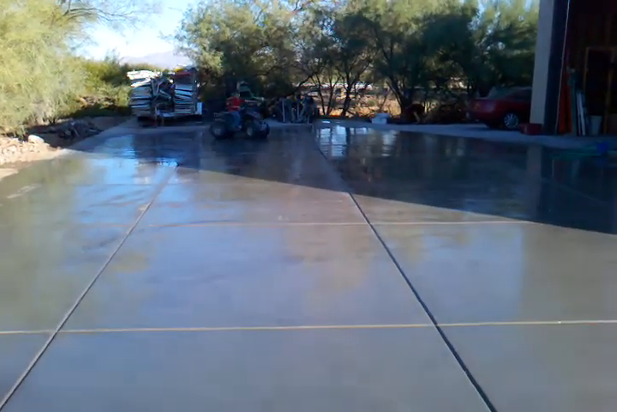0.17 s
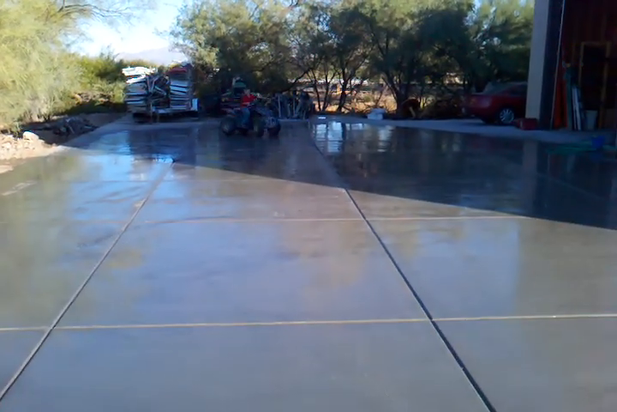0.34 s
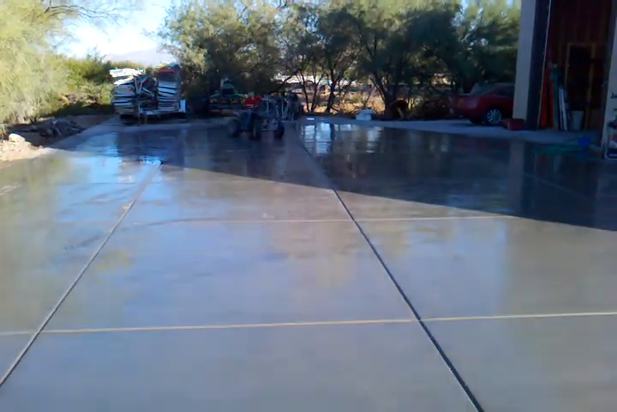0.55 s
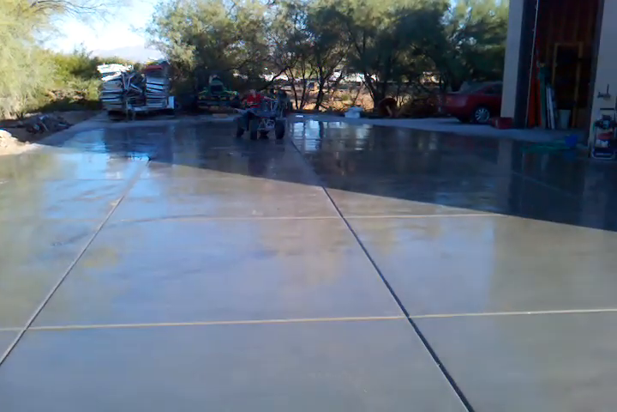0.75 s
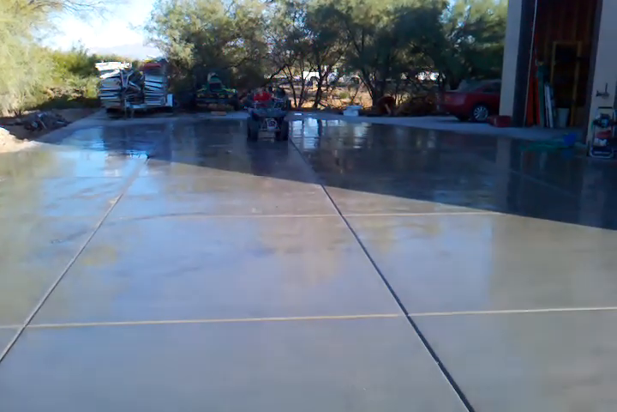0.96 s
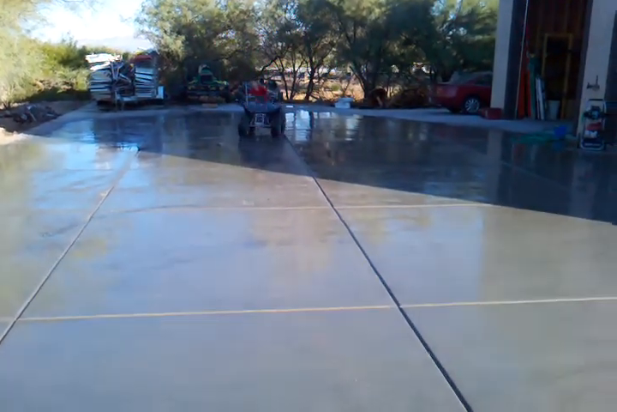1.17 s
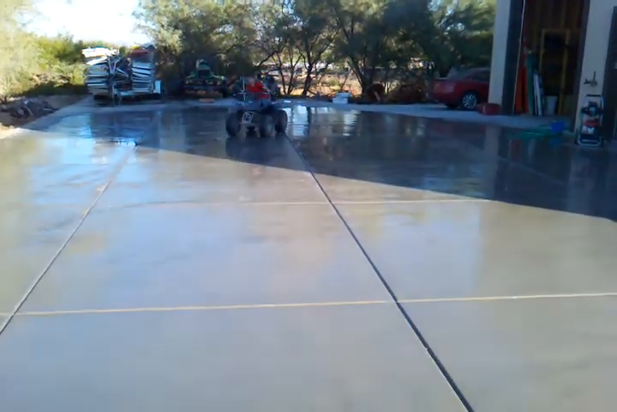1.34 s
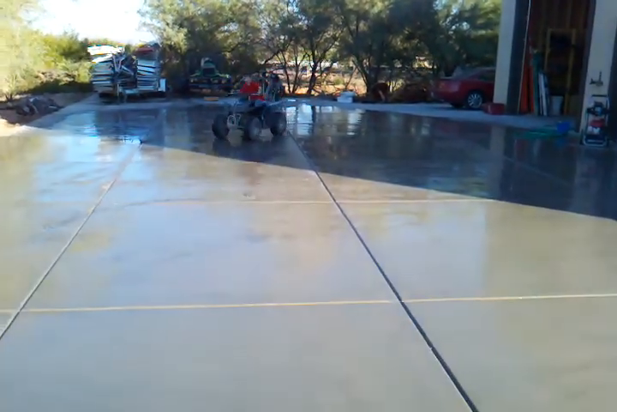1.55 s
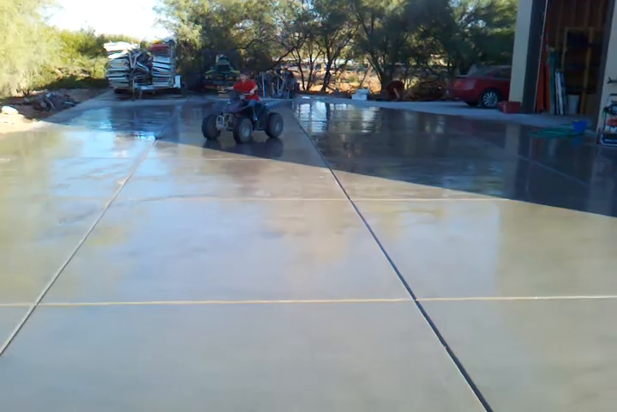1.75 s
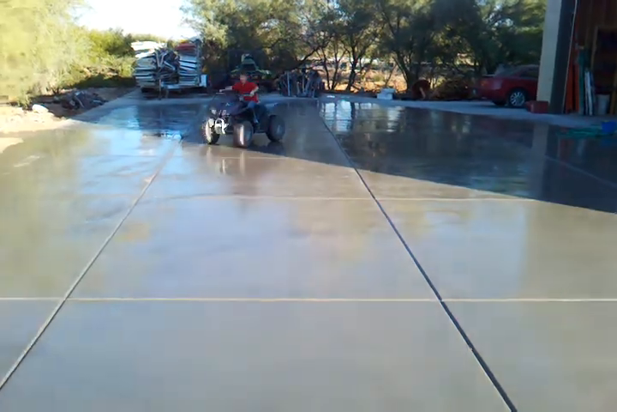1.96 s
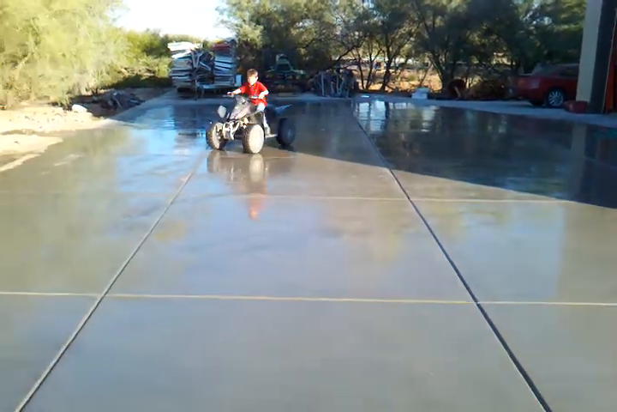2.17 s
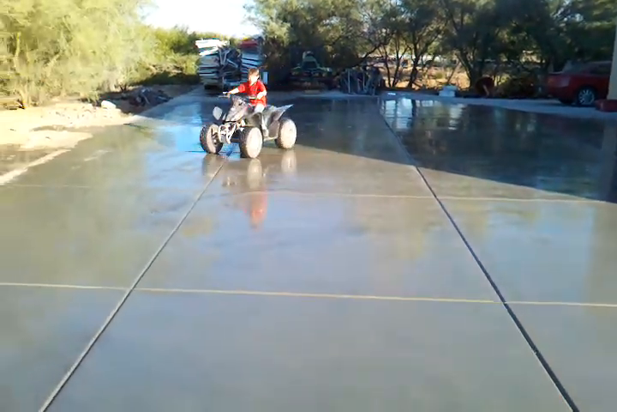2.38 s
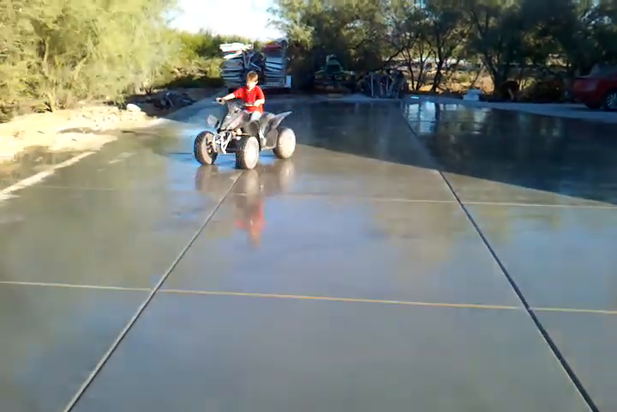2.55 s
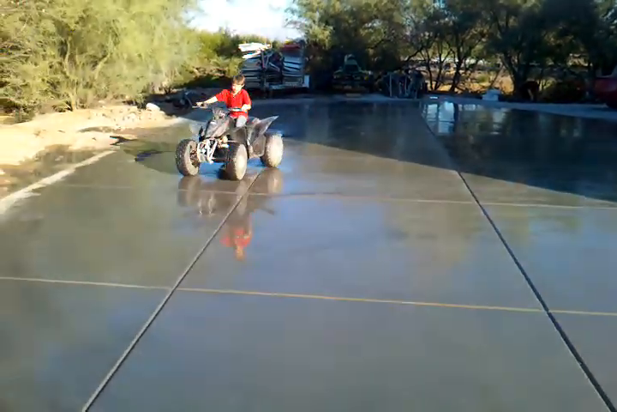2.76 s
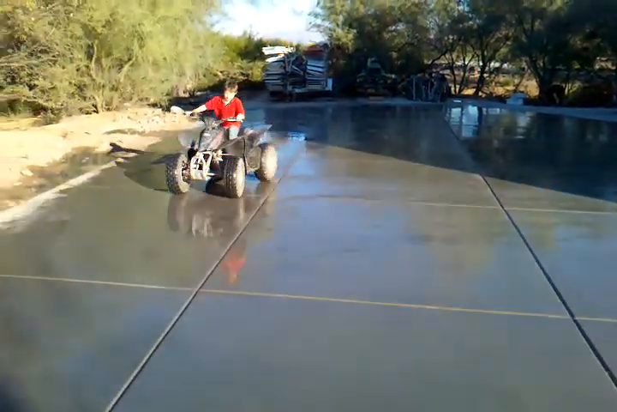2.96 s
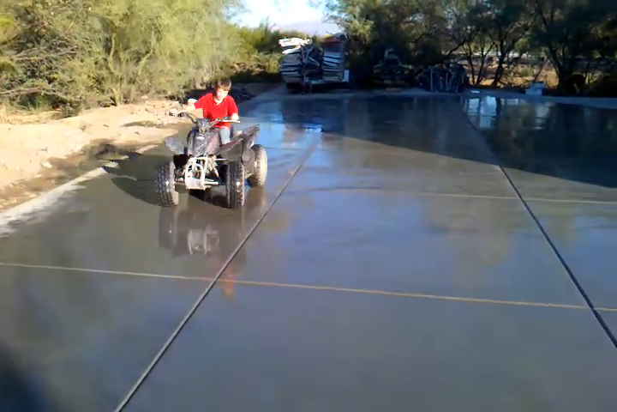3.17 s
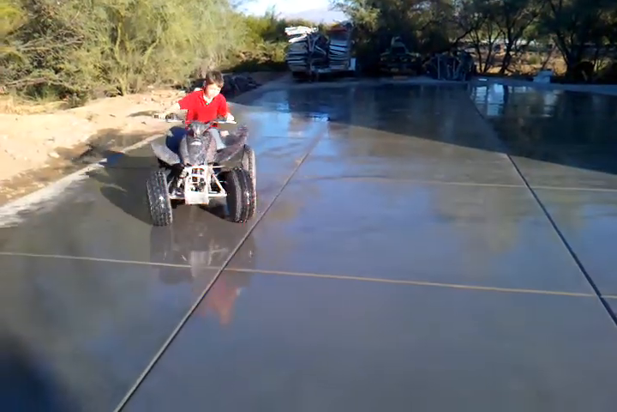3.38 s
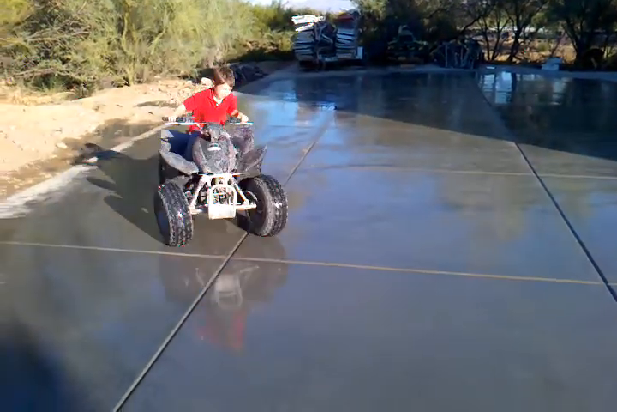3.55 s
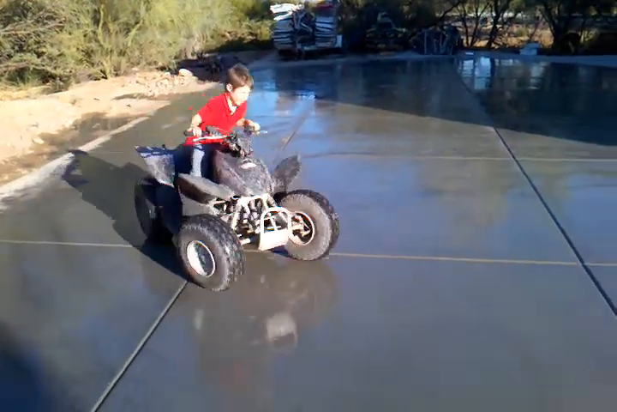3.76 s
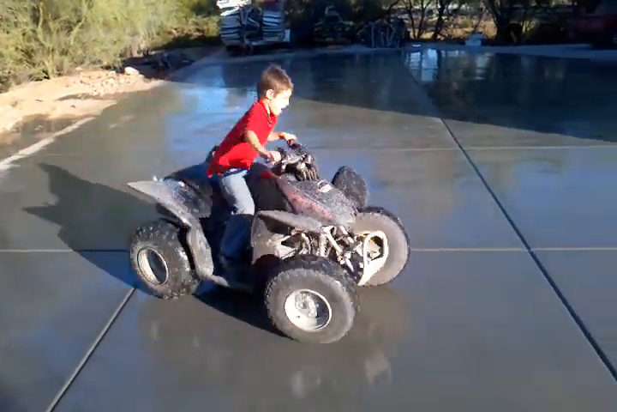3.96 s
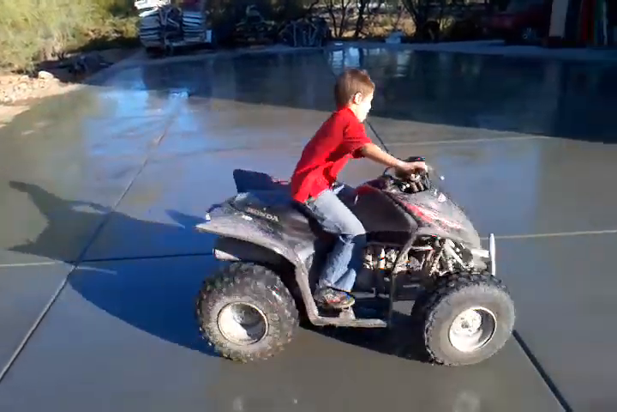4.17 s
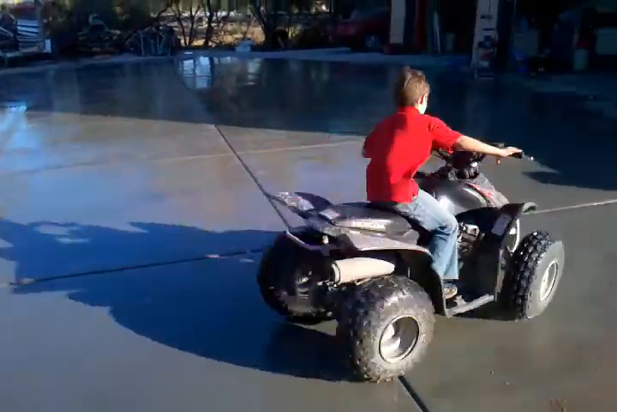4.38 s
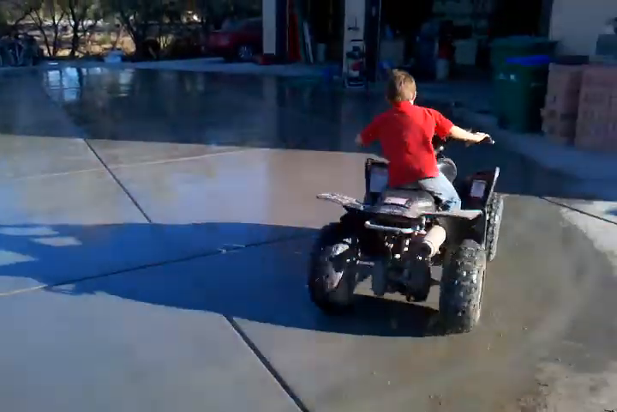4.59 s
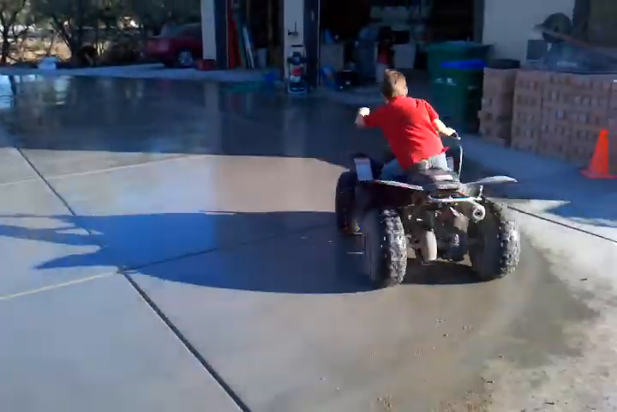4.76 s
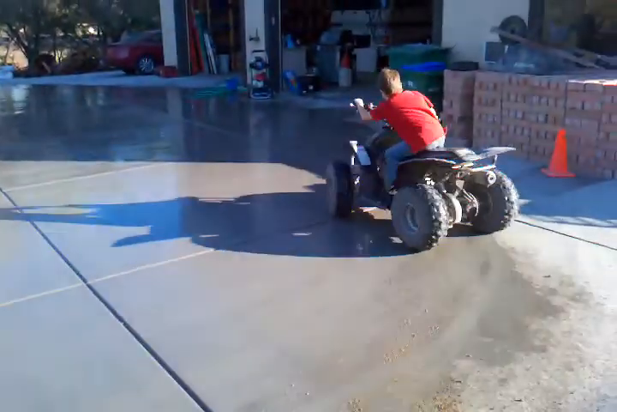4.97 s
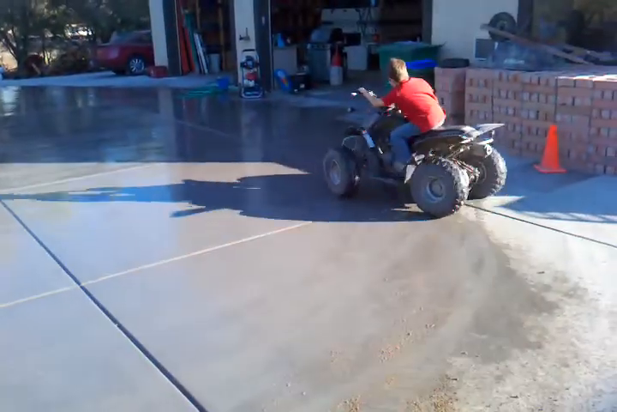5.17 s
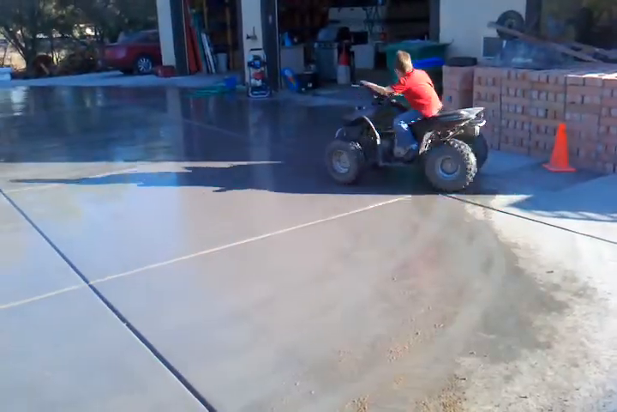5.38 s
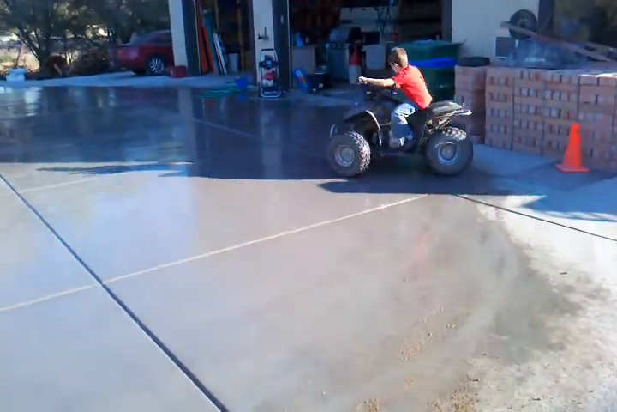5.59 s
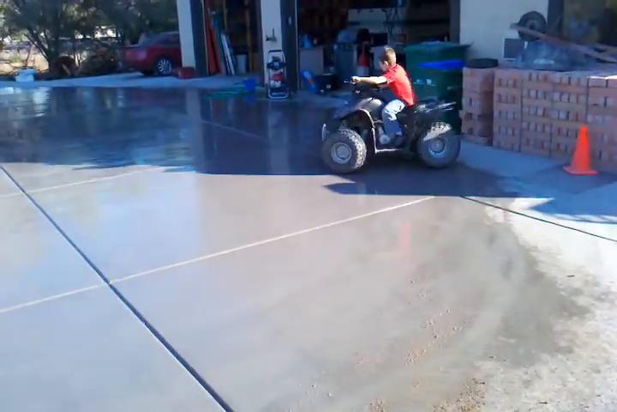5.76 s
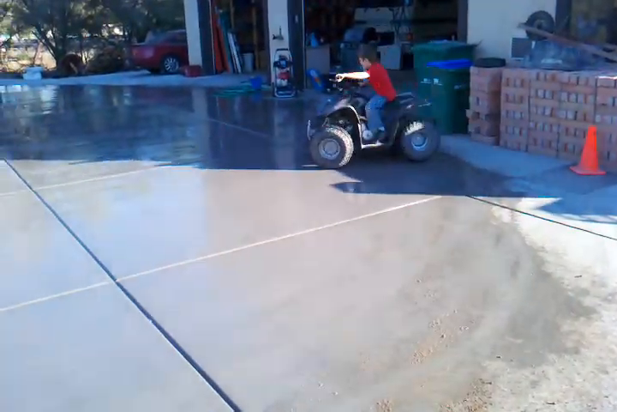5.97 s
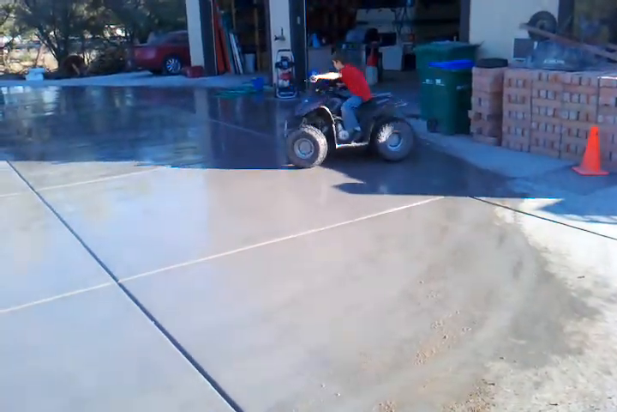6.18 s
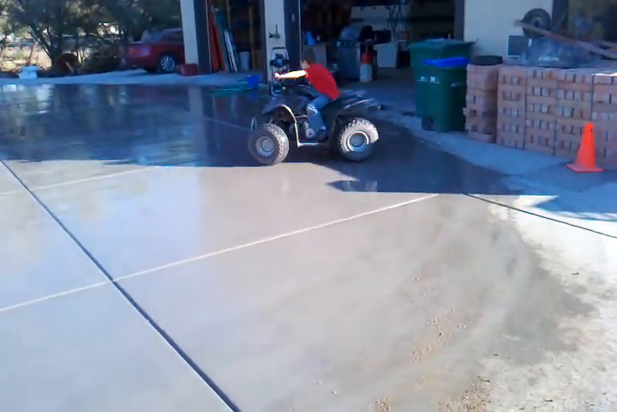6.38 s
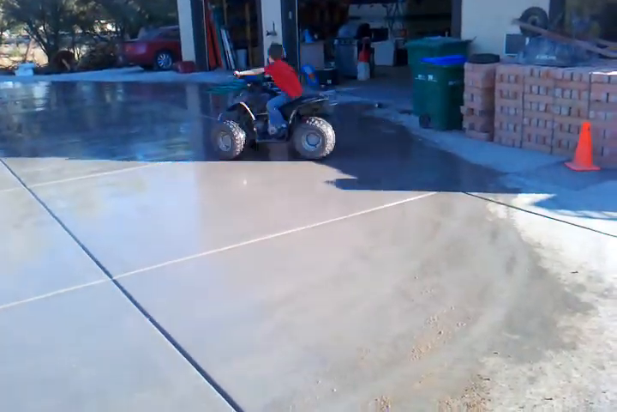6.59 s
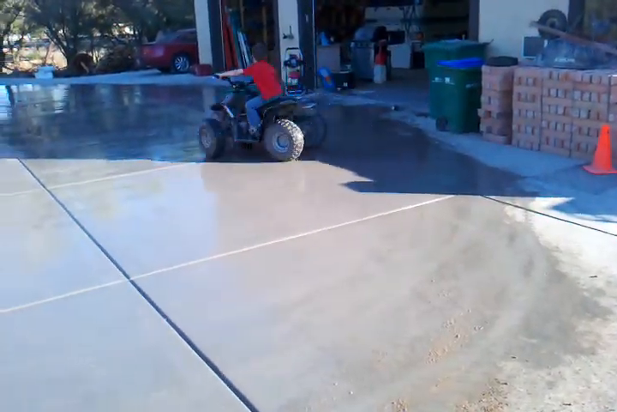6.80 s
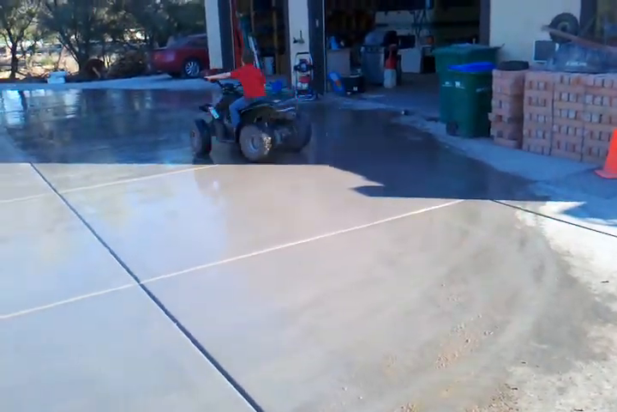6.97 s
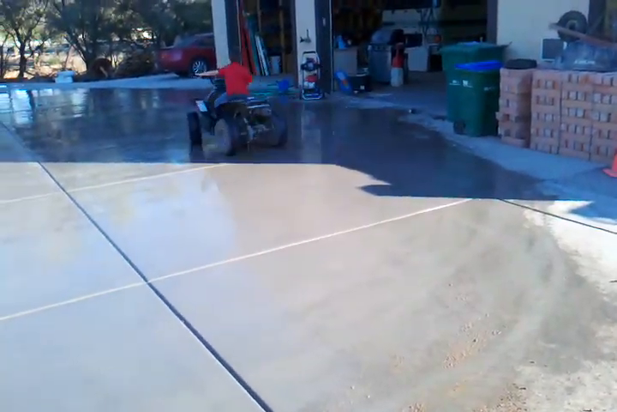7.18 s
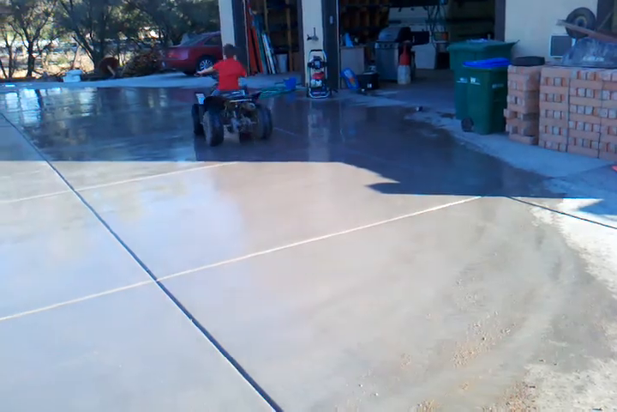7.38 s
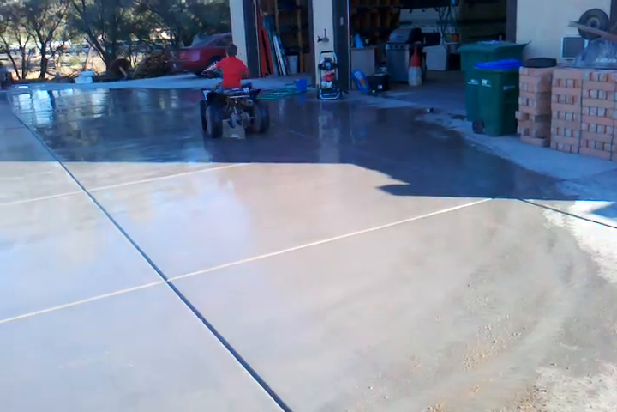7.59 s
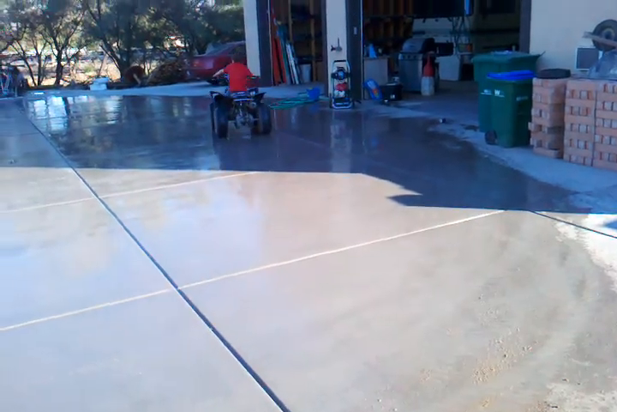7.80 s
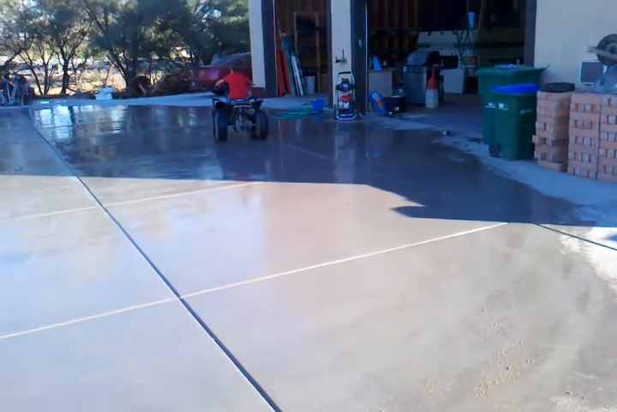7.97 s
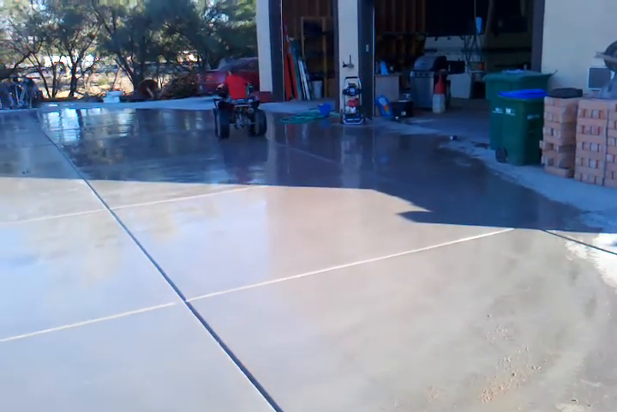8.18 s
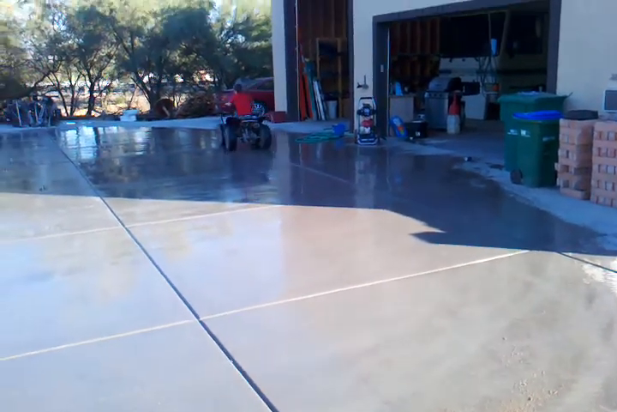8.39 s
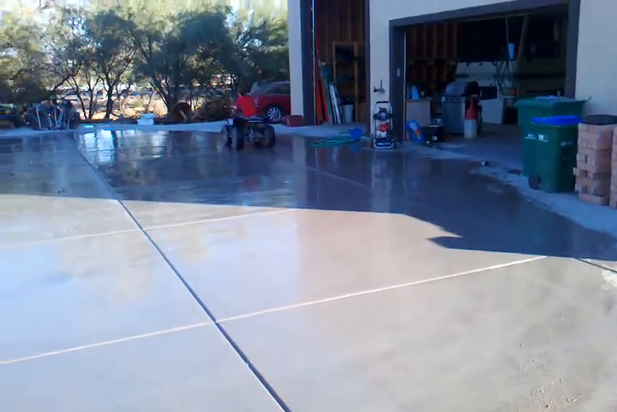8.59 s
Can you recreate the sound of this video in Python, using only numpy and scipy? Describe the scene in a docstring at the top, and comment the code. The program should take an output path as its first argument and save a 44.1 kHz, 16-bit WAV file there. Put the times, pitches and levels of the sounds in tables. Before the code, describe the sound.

Outdoors in an open wet concrete yard, a small single-cylinder quad engine putters at a distance while wind thumps the microphone. It revs in short squeezes, approaches and passes very close around four seconds with loud clatter, gear whine and wet tyre hiss. Loose metal ticks as it turns; the engine slows to an uneven chug, then barks and climbs in pitch, moving away.

```python
"""A wet concrete yard: a small single-cylinder quad bike circles, passes close, runs slow and pulls away.
Each firing thumps through the silencer, cracks out of the tailpipe and rattles the engine.
Filtered noise makes the tyres' hiss and tread roar; sines in step with the engine make the gear whine.
Wind, as lumpy low noise and single eddies, buffets a microphone with two closely spaced ports."""
import sys
import numpy as np
from scipy import signal
from scipy.fft import rfft, irfft, next_fast_len
from scipy.io import wavfile
from scipy.ndimage import uniform_filter1d

SR = 44100
rng = np.random.default_rng(int(sys.argv[2]) if len(sys.argv) > 2 else 0)


def inscribe(sig):
    """Save sig as 16-bit PCM at rate SR to the path in sys.argv[1].

    A 1-D sig is mono; a 2-D sig holds one channel per row.
    Samples are clipped to [-1, 1] before scaling.
    """
    pcm = np.round(np.clip(np.atleast_2d(sig).T, -1, 1) * 32767)
    wavfile.write(sys.argv[1], SR, pcm.astype(np.int16))


N = 381024
TIME = np.arange(N) / SR

# spectrum of the valve rattle and loose parts: frequency_hz, relative_db
RATTLE_SPECTRUM = [(100, -58), (700, -11.5), (1100, 4.5), (1400, 0.5), (1650, 3.5), (1950, 1), (2300, -4),
                   (2800, -4.5), (3600, -12.5), (6000, -15.5)]
# spectrum of the tyre hiss and of the ticks' fine edge: frequency_hz, relative_db
HISS_SPECTRUM = [(1500, 3), (2800, -18.5), (3900, 3), (4600, 2.5), (5500, -3), (7300, -4), (8600, -2.5),
                 (10500, 1), (14000, 7)]
# the level laws below hold at this distance (m) and speed (firings per s)
REFERENCE_M, REFERENCE_RATE = 5, 40
# boom effort on a shut throttle, and bark effort too (dB)
COAST_EFFORT_DB = -8


def from_db(db):
    """Decibels to gain."""
    return np.exp(np.asarray(db) * (np.log(10) / 20))


def rms_one(x):
    """Scale to an rms of 1."""
    return x / np.sqrt(np.mean(x ** 2) + 1e-20)


def in_time(rows):
    """Each column of a curve, drawn straight between its times, at every sample."""
    s, *columns = np.transpose(rows)
    return [np.interp(TIME, s, c) for c in columns]


def swells(rows):
    """Summed gain of bell-shaped swells: centre_s, half_length_s, peak_db."""
    return sum(from_db(db) * np.exp(-((TIME - s) / length) ** 2) for s, length, db in rows)


def drift(rate):
    """Smooth chance with about `rate` turns a second and a spread of 1."""
    step = 40   # worked out at every 40th sample
    r = np.exp(-2 * step * np.pi * rate / SR)
    chance = rng.standard_normal(N // step + 2002)
    slow = signal.lfilter([1], [1, -2 * r, r * r], chance)[2000:]
    return np.interp(np.arange(N) / step, np.arange(len(slow)), rms_one(slow))


def coloured(x, spectrum=((1, 0),), dips=()):
    """Filter by a spectrum and by bell-shaped dips."""
    size = next_fast_len(x.shape[-1] + 2048)
    hz = np.maximum(np.fft.rfftfreq(size, 1 / SR), 1)
    points = np.array(spectrum)
    db = np.interp(np.log(hz), np.log(points[:, 0]), points[:, 1])
    for centre, width, depth in dips:
        db = db + depth * np.exp(-((hz - centre) / width) ** 2)
    return irfft(rfft(x, size) * from_db(db), size)[..., :x.shape[-1]]


def resonate(x, modes):
    """Parallel resonances with alternating signs."""
    out = 0
    for k, (hz, width, db) in enumerate(modes):
        r = np.exp(-np.pi * width / SR)
        poles = [1, -2 * r * np.cos(2 * np.pi * hz / SR), r * r]
        ring = (1 - r * r) / 2 * signal.lfilter([1, 0, -1], poles, x)
        out = out + (-1) ** k * from_db(db) * ring
    return out


def band(x, low_hz, high_hz):
    """Keep one range of frequencies."""
    return signal.sosfilt(signal.butter(2, [low_hz, high_hz], "band", fs=SR, output="sos"), x)


def dense_ring(t60):
    """Middle and side response of countless modes or echoes dying together; mean energy 1."""
    t = TIME[:SR // 4]
    ring = rng.standard_normal((2, len(t))) * from_db(-60 * t / t60)
    ring = ring[:, t < t60 / 2]
    return ring / np.sqrt(np.sum(ring ** 2) / 2)


def convolve(x, response):
    """Play one signal through a middle and a side response."""
    return signal.oaconvolve(np.float32(x)[None], np.float32(response), axes=-1)[:, :N]


def evened(pair):
    """Hold the middle channel near rms 1 over a few engine cycles; the side follows its gain."""
    size = SR // 10
    power = uniform_filter1d(uniform_filter1d(pair[0] ** 2, size), size)
    return pair / np.sqrt(np.abs(power) + 1e-4 * power.mean())


def strokes(cycle, angle, uneven_db, jitter_s):
    """One click per engine cycle at a given share of it, each a little different."""
    at = np.flatnonzero(np.diff(np.floor(cycle - angle)) > 0)
    chance = rng.standard_normal((len(at), 2))
    late_s = chance[:, 0] * np.broadcast_to(jitter_s, N)[at]
    db = chance[:, 1] * np.broadcast_to(uneven_db, N)[at]
    clicks = np.zeros(N)
    clicks[np.clip(at + (late_s * SR).astype(int), 0, N - 1)] = from_db(db)
    return clicks


def yard(x, echo_db, t60, side_share):
    """Direct sound plus scatter from walls and trees, whose pattern shifts steadily."""
    shift = 2 * np.pi * 0.458 * TIME
    echoes = sum(np.cos(shift + k * np.pi / 4) * convolve(x, dense_ring(t60)) for k in range(4))
    echoes = from_db(echo_db) * echoes / np.sqrt(2)
    return evened(np.array([x + echoes[0], side_share * x + echoes[1]]))


def level_db(law, rate, distance, heading):
    """A part is louder or softer with distance, engine speed and the end of the quad that faces us."""
    db, distance_db, speed_db, nose_db, tail_db = law
    facing = np.cos(np.radians(heading))
    near_and_fast = -distance_db * np.log2(distance / REFERENCE_M) + speed_db * np.log2(rate / REFERENCE_RATE)
    return db + near_and_fast - nose_db * np.maximum(facing, 0) + tail_db * np.maximum(-facing, 0)


def still_air():
    """The faint bed of the yard: steady noise with a falling treble."""
    # frequency_hz, relative_db
    air_spectrum = [(30, -5), (150, 14.5), (800, 6), (2000, 7), (5000, -29), (14000, -61)]
    return from_db(-51.5) * rms_one(coloured(rng.standard_normal((2, N)), air_spectrum))


def wind(lumpy_db, buffet_s, top):
    """Lumpy low turbulence, and eddies that each push and pull the ports; the strongest saturate."""
    # spectrum of the turbulence: frequency_hz, relative_db
    wind_spectrum = [(20, -36), (50, -24), (100, 4.5), (190, 0.5), (300, -12), (450, -13), (700, -25),
                     (1200, -37), (4000, -86)]
    # gusts on top of the breeze: centre_s, half_length_s, peak_db
    gust_swells = [(.3, 0.07, -22.5), (.45, 0.029, -19), (.863, 0.016, -18.5), (1.0, 0.074, -14),
                   (1.13, 0.045, -32), (3.35, .09, -36), (5.24, 0.054, -37), (8.5, 0.097, -32)]
    # strong eddies hitting the ports: centre_s, level_db (before saturation)
    buffets = [(.277, -10), (.449, -6.5), (.855, -7.5), (.939, -13), (.995, -4), (1.024, -6), (1.044, -3.5),
               (1.058, -7), (1.12, -9), (1.179, -7.5), (1.229, -15), (1.32, -16.5), (1.414, -13.5),
               (1.703, -37), (2.423, -16.5), (3.327, -7.5), (4.408, -15), (5.91, -22), (6.459, -24),
               (7.663, -11), (8.221, -12.5)]
    # the ports soften the wind's deepest push slightly: frequency_hz, gain_db
    port_low_cut = [(25, -2), (55, 0), (100, 1.5)]
    breeze_db, breeze_waver_db = -37, 1.5
    strength = from_db(breeze_db + breeze_waver_db * drift(2.5)) + swells(gust_swells)
    lumps = rng.standard_normal((1, N)) * from_db(lumpy_db * drift(15))
    out = strength * evened(coloured(lumps, wind_spectrum))[0]

    # weak eddies come at random, about 1.6 a second in the breeze and more often in a gust
    born = TIME[rng.random(N) < 1.6 * strength / from_db(breeze_db) / SR]
    eddies = buffets + [(s, -23 + 3 * rng.standard_normal()) for s in born]
    for (s, db), (size, turn) in zip(eddies, rng.random((len(eddies), 2))):
        near = slice(max(int((s - .02) * SR), 0), int((s + .02) * SR))
        age = (TIME[near] - s) / (buffet_s * (0.9 + 0.49 * size))
        push = np.cos(4.95 * age + 2 * np.pi * turn) / (1 + 1.8 * age ** 2) ** 2
        out[near] += from_db(db) * push
    return coloured(top * np.tanh(out / top), port_low_cut)


def tread(cycle, low_hz, high_hz, throb_db):
    """A hollow roar of band-limited noise, throbbing once per firing."""
    roar = band(band(rng.standard_normal((2, N)), low_hz, high_hz), low_hz, high_hz)
    return rms_one(roar * from_db(throb_db * np.cos(2 * np.pi * cycle)))


def tyres(cycle, distance, flutter_db, throb_db):
    """Wet tread sprays fine droplets; each range flutters by itself and distance shifts their balance."""
    # the spray in three ranges: low_hz, high_hz, loss_db_per_m, tight_turn_change_db
    spray_bands = [(1480, 4820, 1, 2), (5720, 8340, 0.6, 9), (10400, 12020, 0.88, 3)]
    # the tyres scrub in the tight turn, centred at 5.75 s with a half length of 1 s
    turn = np.exp(-((TIME - 5.75) / 1) ** 2)
    # a change at each firing that fades with a time constant of 0.3 cycle
    throb = throb_db * np.exp(-(cycle % 1) / .3)
    out = 0
    for low_hz, high_hz, loss_db, turn_db in spray_bands:
        droplets_db = 2.7 * np.minimum(rng.exponential(1, N), 5)
        spray = rng.standard_normal((2, N)) * from_db(droplets_db)
        swell_db = flutter_db * drift(12.8) + throb - loss_db * distance + turn_db * turn
        out = out + band(spray, low_hz, high_hz) * from_db(swell_db)
    return evened(coloured(out, HISS_SPECTRUM))


def jolts():
    """Loose parts chatter as the quad jolts: short flurries of metallic ticks."""
    # centre_s, half_length_s, peak_db
    jolt_swells = [(4.61, 0.022, -25.5), (4.72, 0.065, -25), (4.832, 0.021, -24.5), (4.99, 0.051, -27.5),
                   (5.06, 0.0098, -27), (5.12, 0.088, -29), (5.352, 0.028, -25), (5.4, 0.013, -40),
                   (5.86, 0.25, -34.5), (7.381, 0.0087, -40)]
    ticks = rng.standard_normal((2, N)) * (rng.random(N) < 2500 / SR)
    metal = coloured(ticks, RATTLE_SPECTRUM) + 0.051 * coloured(ticks, HISS_SPECTRUM)
    return swells(jolt_swells) * rms_one(metal)


def gears(cycle, distance, waver_db):
    """Meshing teeth whine in step with the engine, at full strength only within 3 m."""
    # multiple_of_firing_rate, level_db (against the valve rattle)
    gear_orders = [(18, -15), (24.5, -15), (26, -15), (27.5, -14)]
    tones = 0
    for order, db in gear_orders:
        phase = 2 * np.pi * order * cycle + 0.37 * drift(36)
        tones = tones + from_db(db + waver_db * drift(21.0)) * np.sin(phase)
    return tones * np.minimum(3 / distance, 1) ** 2 * np.array([[1], [.7]])


def clatter(cycle, spectrum, slop_s, ring_t60, rough, burst_share):
    """Contacts ring the engine on every cycle; a burst of gas noise follows each firing."""
    # metal contacts within one engine cycle: share_of_cycle, level_db
    contacts = [(.01, -8), (.27, -11.5), (.48, -9), (.8, -11.5)]
    knocks = 0
    for angle, db in contacts:
        hits = strokes(cycle, angle, uneven_db=2.5, jitter_s=slop_s) * from_db(db + 2 * drift(1.2))
        # other faces of the engine turn to the ports, steadily, as the quad circles
        facing = 2 * np.pi * (0.2948 * TIME + rng.random())
        for share in (np.cos(facing), np.sin(facing)):
            knocks = knocks + share * convolve(hits, dense_ring(ring_t60))
    burst = 1 + np.exp(-(cycle % 1) / burst_share)
    gas = burst * rng.standard_normal((2, N))
    sound = evened(coloured(knocks, spectrum)) + rough * evened(coloured(gas, spectrum))
    return evened(sound) * from_db(1.5 * drift(10.2))


def valve_rattle(cycle):
    """The valves keep time and ring the light metal."""
    return clatter(cycle, RATTLE_SPECTRUM, slop_s=.00009, ring_t60=0.12, rough=0.6, burst_share=0.3)


def engine_knock(cycle):
    """Heavy parts knock with looser timing and ring more briefly."""
    # frequency_hz, relative_db
    knock_spectrum = [(60, -42), (200, -3.5), (400, 1), (500, -12.5), (660, 3), (790, 4.5), (1000, -2),
                      (1250, -18), (1600, -2), (2600, -34)]
    return clatter(cycle, knock_spectrum, slop_s=.00016, ring_t60=0.042, rough=0.65, burst_share=.4)


def intake(cycle):
    """The airbox honks with each gulp of air, half a cycle away from the exhaust pulse."""
    # honk of the airbox: frequency_hz, relative_db
    airbox_spectrum = [(70, -42), (200, 9), (290, 4), (350, -2.5), (420, -17.5), (540, 3.5), (650, -3),
                       (800, 0), (1100, -27)]
    gulps = strokes(cycle, angle=.5, uneven_db=1.2, jitter_s=.00006)
    return yard(coloured(gulps, airbox_spectrum), echo_db=-2, t60=.12, side_share=.35)


def pops(cycle, ring_db):
    """The front of each pulse cracks out of the tailpipe as a puff of gas and sets the pipe ringing."""
    # crack of escaping gas: frequency_hz, relative_db
    crack_spectrum = [(100, -40), (350, -14), (600, 14), (800, 10), (1300, 6), (1900, 16), (2500, -6),
                      (4200, 7.5), (6000, -5), (9000, -7), (14000, -24)]
    # resonances of the tailpipe: centre_hz, width_hz, level_db
    tailpipe_modes = [(618, 53, 6), (796, 124, -7.5), (2000, 410, -35)]
    lead, decay_s = .05, .0042   # share of a cycle ahead of the pulse; time constant of a puff
    fronts = strokes(cycle, angle=-lead, uneven_db=.5, jitter_s=.00005) + 1e-18
    puffs = signal.lfilter([1], [1, -np.exp(-1 / (decay_s * SR))], fronts)
    crack = evened(coloured(puffs * rng.choice([-1, 1], (2, N)), crack_spectrum))
    pipe = band(resonate(fronts, tailpipe_modes), 500, 2300)
    return crack + from_db(ring_db) * yard(pipe, echo_db=-8, t60=.15, side_share=.35)


def throttle():
    """Firing rate, boom and bark effort (dB), overrun drone (0-1): each squeeze spins up, then coasts."""
    # squeezes of the thumb throttle: start_s, end_s, aimed_rate (firings per s), spin_up_s, coasting_s
    # (both time constants), boom_effort_db, bark_effort_db
    squeezes = [(0.039, 0.41, 41.943, 0.142, 3.0, 9.0, 1.5), (0.523, 1.23, 50.745, 0.258, 2.146, 1.0, -1.5),
                (1.946, 2.29, 42.445, 0.195, 3.0, -5.0, 0.5), (2.335, 2.796, 63.639, 1.6, 3.0, -4.5, 1.0),
                (2.901, 3.155, 69.999, 1.063, 3.0, -2.0, 0.0),
                (3.407, 4.371, 60.922, 0.351, 1.756, 2.5, 0.5),
                (4.86, 5.19, 45.41, 0.061, 0.995, -2.0, -1.5),
                (6.199, 6.663, 24.949, 0.09, 2.477, 6.0, 4.0), (6.663, 7.639, 39.516, 0.642, 3.0, 8.0, 5.0),
                (7.665, 8.475, 67.496, 1.6, 3.0, 2.0, 4.5)]
    start_rate, coast_rate = 32.7, 4   # firings per s at the outset, and aimed at when shut
    let_go_s, overrun_s, lag_s = .026, .7, .028   # softening, fading of the drone, lag of the exhaust
    rate = np.full(N, start_rate)
    boom_db, bark_db, overrun = np.zeros((3, N))
    for start, end, aim, spin_up_s, coast_s, boom, bark in squeezes:
        at = int(np.clip(start * SR, 0, N - 1))
        held = np.minimum(TIME[at:], end) - TIME[at]
        shut = np.maximum(TIME[at:] - end, 0)
        driven = aim + (rate[at] - aim) * np.exp(-held / spin_up_s)
        rate[at:] = coast_rate + (driven - coast_rate) * np.exp(-shut / coast_s)
        let_go = 1 - np.exp(-(shut / let_go_s) ** 2)
        boom_db[at:] = boom + (COAST_EFFORT_DB - boom) * let_go
        bark_db[at:] = bark + (COAST_EFFORT_DB - bark) * let_go
        overrun[at:] = let_go * np.exp(-(shut / overrun_s) ** 2)
    lag = np.exp(-1 / (lag_s * SR))
    return rate, *signal.lfilter([1 - lag], [1, -lag], [boom_db, bark_db, overrun])


def exhaust(cycle, heading, stumble, boom_db, bark_db, drone_gain):
    """Each firing pulses the silencer: a short bark, a ringing boom, and a drone on overrun."""
    # the exhaust valve stays open for about a third of a cycle, which weakens the third multiple of the
    # firing rate and favours its neighbours: multiple_of_firing_rate, change_db
    valve_orders = [(2, 6), (3, -10), (4, 3.5)]
    # seen from the side the intake's gulp falls between the pulses; in opposition it favours the odd
    # multiples, in step the even ones: heading_deg, strength (against the pulse)
    gulp_by_heading = [(58, 0), (72, .6), (87, .6), (94, -.35), (100, -.35), (110, 0)]
    # resonance of the silencer: centre_hz, width_hz, level_db
    boom_modes = [(136, 12.5, -8.5)]
    # the silencer's low ring, its bark and its drone on a shut throttle: frequency_hz, relative_db
    boom_spectrum = [(30, -32), (50, -8), (75, 11), (100, 8), (120, 9.5), (180, 11), (300, -27), (600, -35)]
    bark_spectrum = [(90, -76), (150, -8), (200, 4), (245, 5.5), (285, 3), (360, 4), (420, -10),
                     (490, -19.5), (650, -34.5), (1100, -33), (2500, -67)]
    drone_spectrum = [(70, -8), (125, 14), (170, 19), (220, 13.5), (300, -31), (600, -63)]
    # stumbling firings vary more in strength and timing
    pulses = -strokes(cycle, angle=0, uneven_db=.7 + 1.6 * stumble, jitter_s=.00005 + .00018 * stumble)
    pulses = pulses + 1e-18
    valve = sum((from_db(db) - 1) * np.cos(2 * np.pi * order * cycle) for order, db in valve_orders)
    gulps = strokes(cycle, angle=.5, uneven_db=1.5, jitter_s=.0001)
    flow = pulses - 2 * np.gradient(cycle) * valve
    flow += np.interp(heading, *np.transpose(gulp_by_heading)) * gulps

    boom = coloured(resonate(flow, boom_modes), boom_spectrum)
    boom = yard(boom, echo_db=-13, t60=.25, side_share=.42)
    bark = yard(coloured(flow, bark_spectrum), echo_db=-4.5, t60=.2, side_share=.35)
    drone = evened(coloured(pulses, drone_spectrum) * np.array([[1], [.4]]))
    # turbulent flow between the pulses, 13 dB under the bark
    churn = evened(coloured(rng.standard_normal((2, N)), bark_spectrum))
    return (from_db(boom_db) * boom + drone_gain * drone
            + from_db(bark_db) * (bark + from_db(-13) * churn))


def microphone(sound, gusts):
    """Two close ports: sound reaches both, wind pushes them nearly in opposition."""
    # stereo width: frequency_hz, side_against_middle_db
    width = [(100, -78), (300, -11), (700, -10.5), (1100, -13), (1700, -23), (2100, -3), (3300, -1.5),
             (4400, -3.5), (6000, 1.5), (7300, -4), (8800, 4), (11000, -8), (14000, -5)]
    # the spacing of the ports cancels bands in their sum and difference: centre_hz, width_hz, depth_db
    sum_dips = [(2913, 196, -70), (5940, 990, -4.5), (8550, 270, -1), (11640, 1330, -10.5)]
    difference_dips = [(1420, 130, -42), (4380, 340, -20)]
    # the quad swings out to the right and back: time_s, right_over_left_db
    pan = [(0, .3), (3.3, .6), (4.7, 1.3), (6.2, 1.6), (6.8, 2.5), (7.7, .8), (8.64, .6)]
    port_delay = 15   # travel time between the ports (samples)
    middle, side = sound
    middle = coloured(middle, dips=sum_dips)
    side = coloured(side, width, difference_dips)
    opposed = -np.pad(gusts, (port_delay, 0))[:N]   # the right port's push is inverted and late
    pan_db, = in_time(pan)
    ports = np.array([middle + side + gusts, middle - side + opposed])
    return ports * from_db([-pan_db / 2, pan_db / 2])


def scene():
    """The quad follows its path around the microphone, over still air and wind."""
    # path of the quad: time_s, distance_m, heading_deg (0 nose-on, 180 tail-on)
    path = [(0, 11, 68), (.92, 14, 65), (1.25, 10.6, 13), (1.95, 11, 22), (2.8, 6.9, 53), (3.4, 5.75, 77.6),
            (3.9, 3.1, 92), (4.2, 2.4, 90), (4.55, 4.23, 163), (5.05, 4.22, 125), (5.8, 4.2, 93),
            (6.15, 5.7, 120), (6.5, 3.6, 105), (6.9, 4.16, 113), (7.45, 6.1, 110), (8.3, 6.6, 129),
            (8.64, 8.7, 86)]
    # level law of each part at the reference distance and speed: side_on_db, loss_db (per doubling of
    # distance), speed_db (per doubling of speed), nose_on_loss_db, tail_on_gain_db
    boom_law = (-40.5, 5.5, 1.5, 8, -0.5)
    bark_law = (-36.5, 2.5, 2, 6.5, 3)
    pop_law = (-44, 1.2, 4, 10, 3.5)
    intake_law = (-41, -1.5, 11.5, 11.5, -15.5)
    knock_law = (-33.5, 3, 5, 14, -4)
    rattle_law = (-34, 6.5, 7.5, 13, -1.5)
    tread_law = (-52, 12, 6.5, 22, 0.5)
    hiss_law = (-35, 7.5, 7, 10, 1.5)
    rate, boom_effort_db, bark_effort_db, overrun = throttle()
    distance, heading = in_time(path)
    laws = (boom_law, bark_law, pop_law, intake_law, knock_law, rattle_law, tread_law, hiss_law)
    boom_db, bark_db, pop_db, intake_db, knock_db, rattle_db, tread_db, hiss_db = (
        level_db(law, rate, distance, heading) for law in laws)

    # slow running at low effort is unsteady: worst at 34 firings per s and below, smooth from 50
    stumble = np.clip(boom_effort_db / COAST_EFFORT_DB, 0, 1) * np.interp(rate, (34, 50), [1, 0])
    cycle = np.cumsum(rate) / SR + .025 * stumble * drift(3)   # there the speed hunts as well
    # the drone dies as the engine slows: full at 40 firings per s, gone at 33
    drone_gain = from_db(-37) * overrun * np.interp(rate, (33, 40), [0, 1])
    drone_gain = drone_gain * (REFERENCE_M / distance) ** 2

    sound = still_air()
    sound += from_db(tread_db) * tread(cycle, low_hz=306, high_hz=526, throb_db=1.5)
    sound += from_db(hiss_db) * tyres(cycle, distance, flutter_db=2.5, throb_db=-1.0)
    sound += jolts()
    sound += from_db(rattle_db) * gears(cycle, distance, waver_db=3)
    sound += from_db(rattle_db) * valve_rattle(cycle)
    sound += from_db(knock_db) * engine_knock(cycle)
    sound += from_db(intake_db + bark_effort_db) * intake(cycle)
    sound += from_db(pop_db + bark_effort_db) * pops(cycle, ring_db=-10.0)
    sound += exhaust(cycle, heading, stumble, boom_db + boom_effort_db, bark_db + bark_effort_db, drone_gain)
    return microphone(sound, wind(lumpy_db=4.0, buffet_s=0.0027, top=0.9))


def record(dry):
    """The top is cut steeply above 13950 Hz."""
    return signal.sosfiltfilt(signal.ellip(10, .05, 70, 13950, fs=SR, output="sos"), dry)


dry = scene()
out = record(dry)
inscribe(out)
```